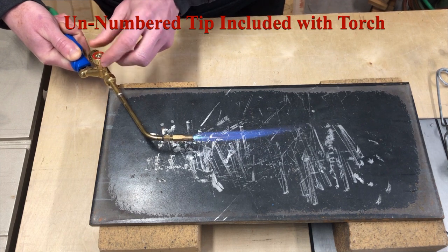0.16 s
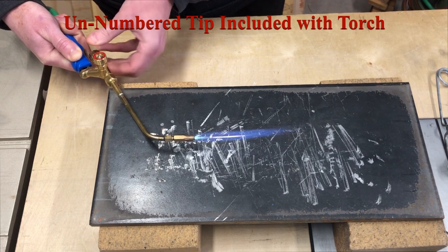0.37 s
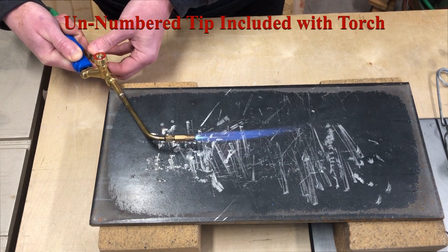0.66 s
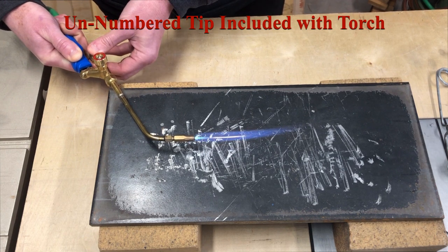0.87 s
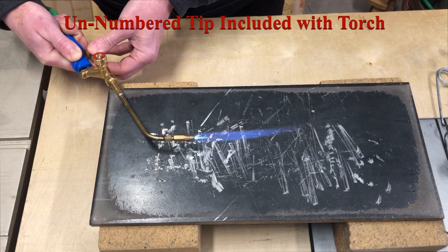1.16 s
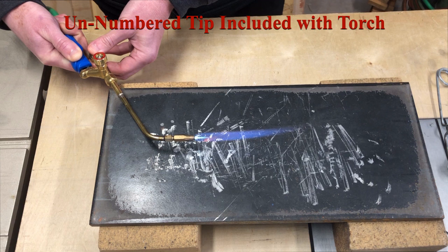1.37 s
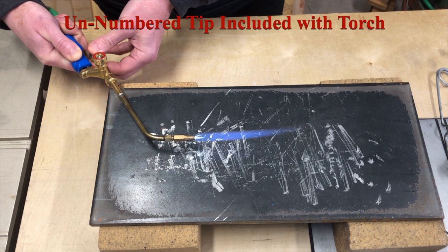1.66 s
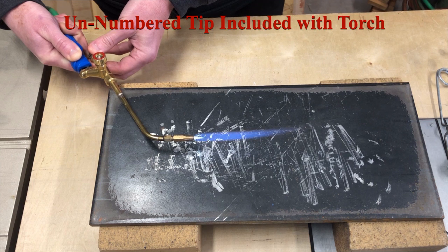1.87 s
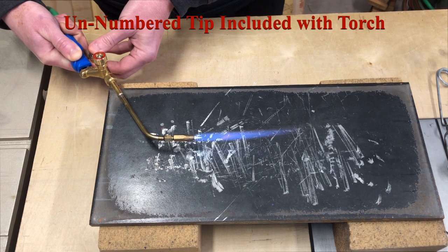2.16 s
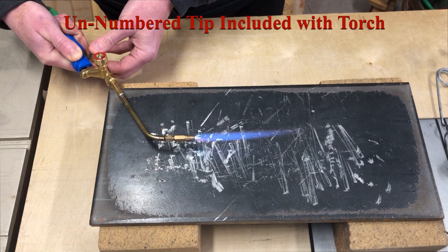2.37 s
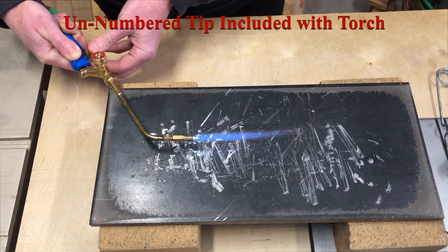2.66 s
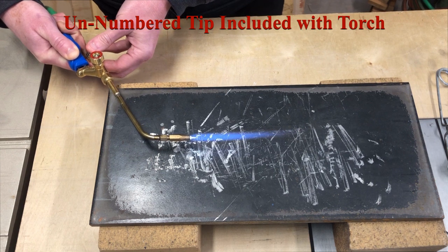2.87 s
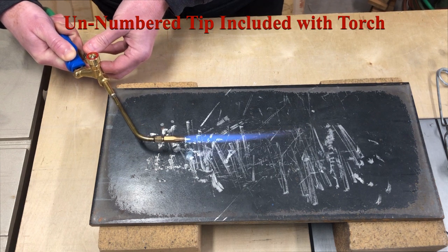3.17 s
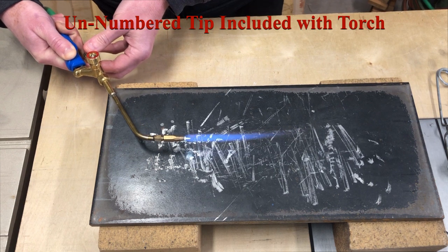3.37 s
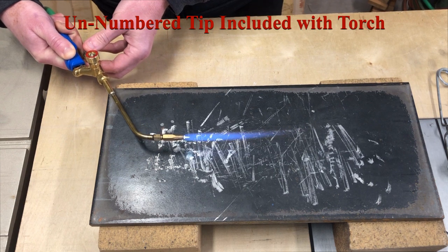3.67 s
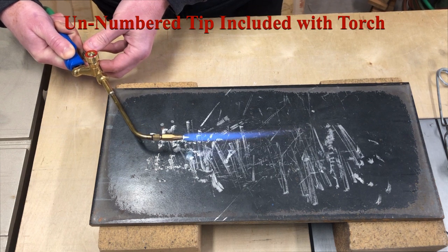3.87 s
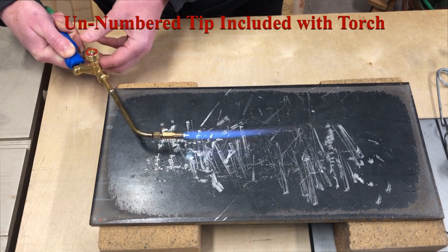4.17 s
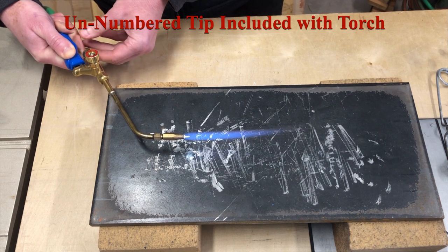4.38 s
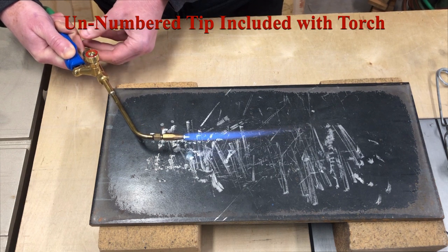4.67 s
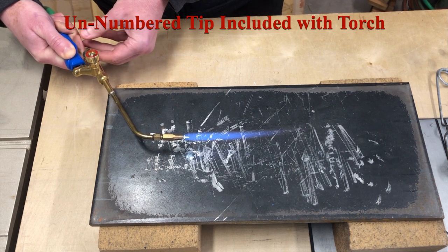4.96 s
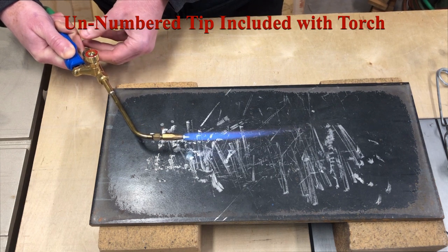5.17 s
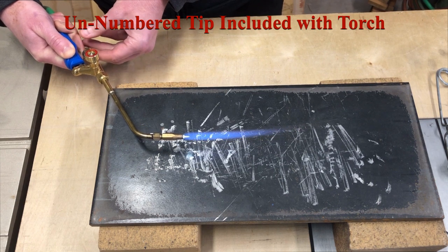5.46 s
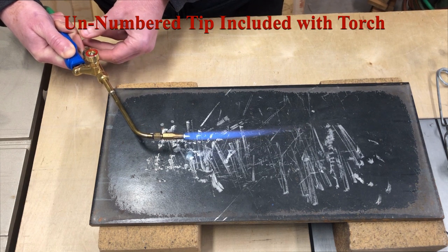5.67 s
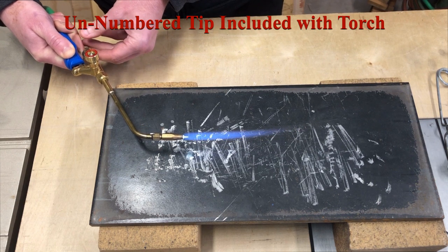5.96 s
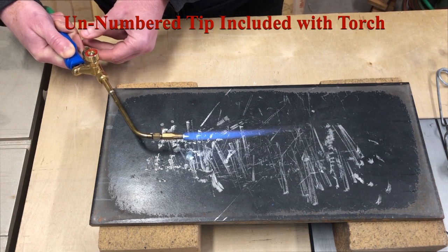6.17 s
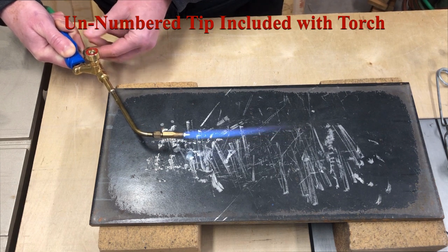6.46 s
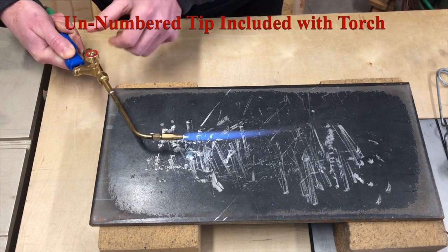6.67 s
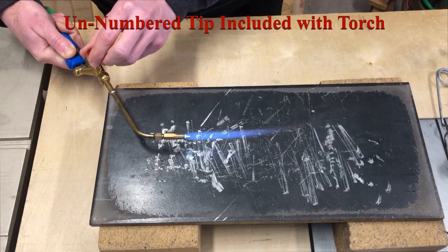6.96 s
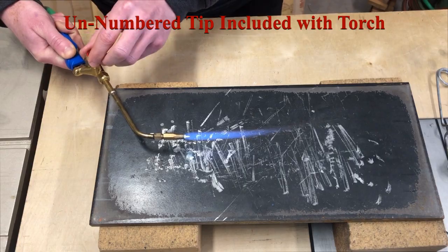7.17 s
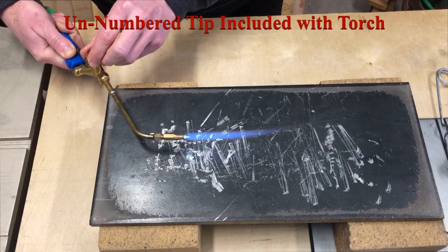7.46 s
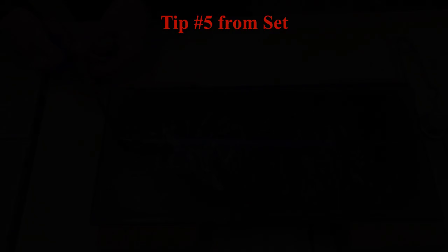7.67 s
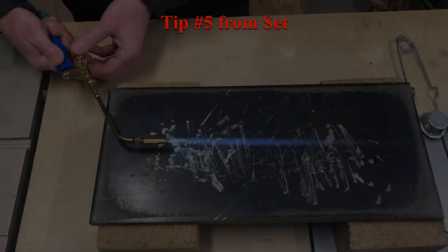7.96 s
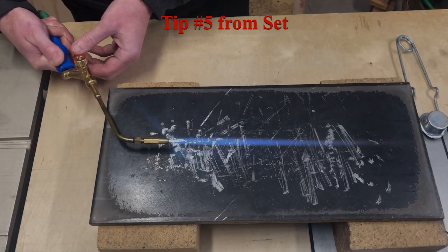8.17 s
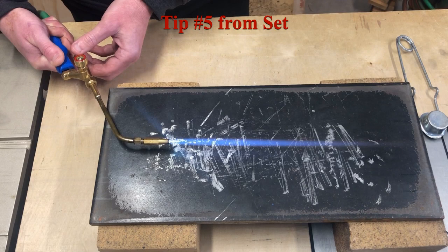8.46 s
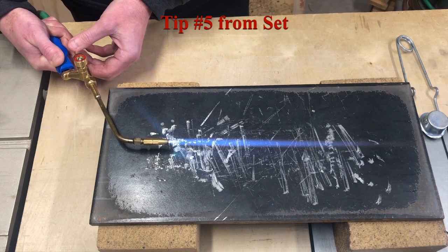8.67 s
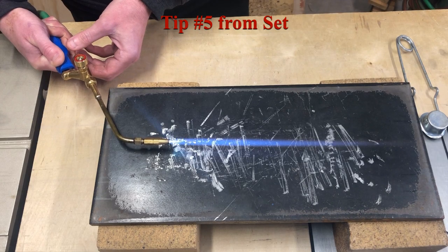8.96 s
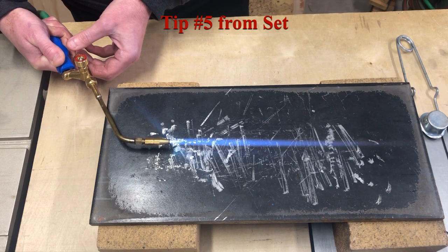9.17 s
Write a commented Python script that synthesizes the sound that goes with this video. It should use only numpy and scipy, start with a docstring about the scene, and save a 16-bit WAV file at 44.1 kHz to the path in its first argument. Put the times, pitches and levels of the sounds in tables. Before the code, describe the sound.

A hand-held gas torch burns over a stone slab on an indoor bench. Its small flame gives a soft, midrange roar and thin hiss, with faint spits and brief dropouts at first. The hiss grows and steadies as the valve opens. Abruptly a larger jet takes over, far louder and brighter, rushing with quick sags and flares to the end. The microphone is close, with short workshop reflections.

```python
"""A small gas flame roars softly and its jet hisses, spitting and faltering at first; the hiss grows as the
valve is opened. Then, at a stroke, a larger tip burns, far louder and brighter. The hand-held torch burns
over a stone slab on a bench indoors. Flames and jets are noise shaped by resonances, those of the brass
tube among them, and shaken by eddies. Echoes from bench and walls color both tips. Rumble, deep lumps
of air and a fuzzy hum lie behind the small tip, a louder rumble behind the large one."""
import sys
import numpy as np
from scipy import signal
from scipy.fft import rfft, irfft
from scipy.io import wavfile
from scipy.ndimage import map_coordinates

SR = 44100
rng = np.random.default_rng(int(sys.argv[2]) if len(sys.argv) > 2 else 0)


def ratio(d):
    """dB to gain"""
    e = np.asarray(d, float) / 20
    return 10 ** e


def generate_wav(signal):
    """Clip the signal to [-1, 1] and save it as 16-bit WAV at the path in sys.argv[1]."""
    frames = np.transpose(np.atleast_2d(signal))
    scaled = np.clip(frames, -1, 1) * 32767
    pcm = np.round(scaled).astype(np.int16)
    wavfile.write(sys.argv[1], SR, pcm)


N = 411012  # length in samples
FRAME, HOP = 2048, 256  # short-time spectra, in samples
HZ = np.fft.rfftfreq(FRAME, 1 / SR)  # frequency of each bin
T = np.arange(N // HOP + 9) * HOP / SR  # time of each frame in seconds


def evened(x):
    """Scales to rms 1."""
    return x / np.sqrt(np.mean(x ** 2))


def unit(power):
    """Makes the total power 1 in every frame."""
    return power / power.sum(-1, keepdims=True)


def columns(rows):
    """Turns the columns of a timed table into curves with one value a frame."""
    seconds, *values = np.transpose(rows)
    return [np.interp(T, seconds, v)[:, None] for v in values]


def bump(middle_s, half_length_s):
    """A smooth flat-topped hump in time."""
    return np.exp(-((T[:, None] - middle_s) / half_length_s) ** 4)


def spectrum(points):
    """Reads a spectrum table as power per bin, with total power 1."""
    hz, db = np.transpose(points)
    return unit(ratio(np.interp(np.log(HZ + 1), np.log(hz + 1), db)) ** 2)


def ringing(modes, state=np.zeros(1), from_hz=0, to_hz=SR):
    """Power per bin of steep resonances, whose levels glide from column to column with the state."""
    modes = np.array([m for m in modes if from_hz <= m[0] < to_hz])
    center_hz, width_hz = modes[:, :1], modes[:, 1:2]
    shape = 1 / (1 + ((HZ - center_hz) / width_hz) ** 2) ** 2
    db = np.array([np.interp(state, range(len(m) - 2), m[2:]) for m in modes])
    return unit(ratio(db.T) ** 2 @ shape)


def drift(seconds, hz=None):
    """Smooth chance of rms 1: one value a frame, or with hz, patches over frame and frequency."""
    x = rng.standard_normal((len(T), len(HZ) if hz else 1))
    x = signal.lfilter([1], [1, -np.exp(-HOP / SR / seconds)], x, axis=0)
    if hz:  # blur along frequency
        blur = np.exp(-(np.arange(len(HZ) // 2 + 1) * hz / SR * 2 * np.pi) ** 2)
        x = irfft(rfft(x, axis=1) * blur, len(HZ), axis=1)
    return evened(x)


def noise(power, size=1):
    """Random short-time spectra with the given power; shorter frames (FRAME / size) follow quick changes."""
    power = power[:, ::size] * size
    real, imaginary = rng.standard_normal((*power.shape, 2)).T
    spectra = (real + 1j * imaginary) * np.sqrt(power.T)
    x = signal.istft(spectra, nperseg=FRAME // size, noverlap=FRAME // size - HOP)[1]
    return np.sqrt(FRAME / size / HOP / 3) * x[:N]


def gusts(depth_db, seconds):
    """Fast eddies: a gain that shakes from moment to moment."""
    x = signal.lfilter([1], [1, -np.exp(-1 / SR / seconds)], rng.standard_normal(N))
    return evened(ratio(depth_db * evened(x)))


# The small tip as its valve opens. Each row: time in seconds, valve (0 starved, 1 half, 2 open),
# brightness in dB per octave, flame roar in dB, jet hiss in dB.
SMALL_TIP = [(0, 0, 0, -56.5, -66.5), (.6, 0, -2, -56, -67.5), (1.2, .1, -1, -55.5, -67.5),
             (1.5, .3, 2.2, -53, -64), (1.8, .3, 3.6, -51.5, -60), (2.1, 1.4, 0.3, -50, -57),
             (2.5, 1.05, -1, -50.5, -56.5), (2.8, 1, -1, -49.8, -56), (3.0, 1.1, -1, -52.5, -57),
             (3.3, 1.06, .5, -52.3, -56.1), (3.6, 2, -.5, -50.5, -54.5), (4.0, 1.95, -.6, -51.5, -54.6),
             (4.5, 2.2, -1, -50.5, -55), (5.2, 2.03, -1.3, -49.8, -53.5), (6.0, 2.1, -0.1, -50, -53),
             (6.5, 2.0, 0.5, -50.7, -53), (6.9, 1.98, .1, -49.8, -52.2), (7.35, 1.5, 1.0, -48.5, -51.4),
             (7.64, 1.92, 1.3, -50.5, -51.5)]


def small_tip():
    """Roar, flutter, hiss and spits; opening the valve shifts power among the modes and steadies the jet."""
    valve, tilt_db, roar_db, hiss_db = columns(SMALL_TIP)
    flame = small_roar(valve, roar_db) + flutter()
    flame *= ratio(0.56 * drift(0.11, 300)) ** 2
    jet = small_hiss(valve, tilt_db, hiss_db) + whistle()
    return noise(flame) * gusts(0.87, 0.0026) + noise(jet, size=2) * gusts(0.75, 0.0028) + spits()


# Brief dips of the small jet, mostly while starved. Each row: middle in seconds, depth in dB,
# half length in seconds.
FALTERS = [(.25, -8, 0.027), (0.49, -7, 0.028), (0.707, -9, 0.028), (0.894, -4.5, .035), (5.91, -4, .025)]


def falters():
    """The small jet falters: a dip in dB that lower hiss, roar and flutter share."""
    return sum(db * bump(s, half_length) for s, db, half_length in FALTERS)


# Modes of the small flame over the slab. Each row: frequency in Hz, width in Hz, relative level in dB
# when starved, relative level in dB from half open on.
SMALL_ROAR_MODES = [(870.0, 128.0, -12.0, -16.5), (990.0, 52.0, -7.5, -13.5), (1090.0, 105.0, -7.0, -10.0),
                    (1330.0, 91.0, 3.5, 0.0), (1470.0, 96.0, 1.0, -2.0), (1590.0, 68.0, -2.0, -5.0),
                    (1710.0, 119.0, 2.0, 1.0), (1820.0, 18.0, -3.5, -12.0), (1960.0, 101.0, 3.0, 2.0),
                    (2080.0, 53.0, -0.0, 0.5), (2180.0, 116.0, -1.5, -1.0), (2270.0, 75.0, 1.0, -0.5),
                    (2380.0, 95.0, 4.5, 5.0), (2560.0, 77.0, 2.0, 2.5), (2630.0, 75.0, 3.0, 5.0),
                    (2680.0, 55.0, -2.0, -19.5), (2770.0, 91.0, 2.0, 3.5), (2950.0, 83.0, -2.0, 0.5),
                    (3020.0, 53.0, -2.5, 1.0), (3170.0, 96.0, -7.5, -4.5), (3270.0, 61.0, -7.5, -2.0),
                    (3430.0, 208.0, -18.0, -8.5), (3680.0, 335.0, -9.0, -9.5)]


def small_roar(valve, roar_db):
    """The flame over the slab roars as noise in modes that follow the valve; it takes part of each falter."""
    roar_db = roar_db + 0.46 * falters() + 0.35 * drift(0.04)
    return ratio(roar_db) ** 2 * unit(ringing(SMALL_ROAR_MODES, valve[:, 0]) * (HZ <= 3720))


# Low flutter modes of the small flame. Each row: frequency in Hz, width in Hz, relative level in dB.
FLUTTER_MODES = [(290, 80, -9.5), (348, 45, -3), (453, 29, -2), (516, 56, -1.5), (692, 80, 0)]
# The low flutter swells and sinks. Each row: time in seconds, level in dB.
FLUTTER_LEVEL = [(0, -71), (.3, -69.5), (1.1, -67.5), (1.45, -75), (1.62, -66), (2.2, -67), (2.5, -71),
                 (2.8, -74), (3.0, -80), (3.4, -79), (3.6, -74.5), (4.6, -76), (5.1, -72.5), (6.5, -74.5),
                 (7.15, -74), (7.3, -68), (7.64, -71)]


def flutter():
    """Low flutter of the flame, wavering by chance; its highest mode follows the swells only in part."""
    low_db = columns(FLUTTER_LEVEL)[0] + 0.7 * falters() + 1.57 * drift(0.037)
    top_db = -73 + 0.6 * (low_db - low_db.mean())
    top = unit(ringing(FLUTTER_MODES, from_hz=600) / (1 + (HZ / 770) ** 40))
    return ratio(low_db) ** 2 * ringing(FLUTTER_MODES, to_hz=600) + ratio(top_db) ** 2 * top


# Modes of the small tip and tube. Each row: frequency in Hz, width in Hz, then relative levels in dB when
# starved, half open and open.
SMALL_TUBE_MODES = [(3690.0, 493.0, 7.0, 3.0, -2.0), (4210.0, 408.0, 5.0, -3.5, -3.5),
                    (4580.0, 228.0, 6.0, 8.0, 3.0), (5050.0, 245.0, -3.5, -0.0, -9.0),
                    (5340.0, 416.0, 1.5, -4.0, -6.0), (5810.0, 229.0, -2.5, -1.5, -10.0),
                    (6150.0, 135.0, -4.5, -0.5, -4.5), (6380.0, 114.0, 0.5, 3.5, -5.0),
                    (6720.0, 249.0, 0.5, 6.0, -1.5), (7150.0, 96.0, -11.0, -5.0, -35.5),
                    (7340.0, 422.0, -12.0, -5.0, -18.5), (8140.0, 441.0, -11.0, -16.5, -6.0),
                    (8460.0, 228.0, -2.5, -10.5, -5.5), (8740.0, 160.0, 2.5, -0.5, 2.5),
                    (8970.0, 208.0, -3.5, -0.5, 0.5), (9500.0, 399.0, -11.5, -29.5, -3.5),
                    (10030.0, 492.0, 1.5, -2.0, -1.5), (10570.0, 325.0, 1.0, -1.0, 2.0),
                    (11160.0, 340.0, -4.0, -2.5, 1.5), (11730.0, 422.0, -3.0, -3.5, -3.0),
                    (12040.0, 54.0, -9.5, -5.0, -12.5), (12440.0, 63.0, -11.5, -9.0, -7.0),
                    (12960.0, 486.0, -7.5, -29.0, 4.0), (13350.0, 334.0, -0.5, 1.0, 6.0),
                    (13750.0, 685.0, -13.5, 1.0, 1.0), (14390.0, 90.0, -13.5, -4.0, -5.0),
                    (14830.0, 986.0, -4.5, -4.5, -3.0), (15330.0, 251.0, -3.5, -2.5, -28.5),
                    (15640.0, 245.0, -32.0, 2.5, -2.0)]
# The highest hump of the small jet moves up, then down. Each row: time in seconds, shift in Hz.
HUMP_SHIFT = [(0, 0), (3.3, 0), (3.8, 250), (5, 150), (6.3, 50), (7, -120), (7.64, -200)]


def small_hiss(valve, tilt_db, hiss_db):
    """Jet noise rings the tube modes; a starved jet sputters in the upper middle."""
    tilt = ratio(tilt_db * np.log2((HZ + 1) / 8000)) ** 2
    hiss = unit(ringing(SMALL_TUBE_MODES, valve[:, 0]) * (HZ > 3720) * tilt)
    # only the region around 13300 Hz is shifted
    shift_hz = columns(HUMP_SHIFT)[0] / (1 + ((HZ - 13300) / 1500) ** 4)
    frame_index = np.arange(len(T))[:, None] + 0 * HZ
    hiss = map_coordinates(hiss, [frame_index, (HZ - shift_hz) * FRAME / SR], order=1)
    starved = np.clip(1.2 - valve, 0, 1) / (1 + ((HZ - 9500) / 4500) ** 8)
    sputter_db = (0.6 + 3.2 * starved) * drift(0.0098, 250)
    hiss *= ratio(hiss_db + sputter_db + 0.5 * drift(0.03)) ** 2
    # the falters reach the lower hiss, around 6300 Hz
    hiss *= ratio(falters() / (1 + ((HZ - 6300) / 1500) ** 8)) ** 2
    return hiss


# A narrow whistle of the small jet, from half open into open. Each row: time in seconds, level in dB.
WHISTLE_LEVEL = [(1.6, -100), (2.5, -82), (2.75, -71), (3.2, -66), (3.4, -73), (4.0, -71), (4.25, -68),
                 (4.65, -82), (5.2, -100)]


def whistle():
    """A narrow band of noise that wanders around 6690 Hz."""
    center_hz = 6690 + 40 * drift(0.05)
    shape = unit(1 / (1 + ((HZ - center_hz) / 60) ** 2) ** 2)
    return ratio(columns(WHISTLE_LEVEL)[0]) ** 2 * shape


# Faint spits of the starved jet. Each row: time in seconds, click peak in dB before the band filter.
SPITS = [(0.1421, -48), (0.2259, -48), (0.2573, -53), (0.2912, -49), (0.3905, -51), (0.4419, -51),
         (0.5556, -50), (0.7796, -53), (1.0944, -51)]


def spits():
    """Single clicks pass a band filter and turn into short spits."""
    clicks = np.zeros(N)
    seconds, db = np.transpose(SPITS)
    clicks[np.round(seconds * SR).astype(int)] = ratio(db)
    return signal.lfilter(*signal.butter(2, [2000, 9500], "band", fs=SR), clicks)


def large_tip():
    """A faster jet: the higher tube modes lead and throb together."""
    sag_db = sags()
    roar = noise(large_roar(sag_db), size=2) * gusts(0.66, 0.0042)
    jet = noise(large_jet(sag_db), size=2) * gusts(2.02, 0.0028)
    return roar + jet


# The large jet sags, then snaps back. Each row: time of the snap in seconds, depth in dB,
# time constant of the sag in seconds.
SAGS = [(7.905, -4.5, .04), (8.007, -5, .02), (8.115, -3.5, 0.022), (8.175, -3, .015), (8.39, -3, .03),
        (8.67, -3.5, .03), (8.952, -2.5, .03)]


def sags():
    """Each sag deepens faster and faster, then ends at once: a curve in dB."""
    t = T[:, None]
    return sum(db * np.exp(np.minimum(t - s, 0) / length) * (t < s) for s, db, length in SAGS)


# Brief flares of the large flame. Each row: middle in seconds, level in dB, half length in seconds,
# dip of the top fizz in dB.
FLARES = [(7.952, -54, .015, -4), (8.056, -50, .02, -5), (8.224, -47, .02, -8), (8.98, -50, .016, -1)]
# Fizz of the large jet. Each row: time in seconds, jet fizz in dB, top fizz in dB.
LARGE_FIZZ = [(7.66, -35.5, -44), (7.73, -33.3, -42), (7.85, -35, -42), (8.2, -34.5, -44),
              (8.27, -32.8, -42), (8.55, -34.5, -42.5), (8.75, -33.5, -41), (8.9, -35, -41),
              (9.05, -33.4, -40), (9.32, -34, -37.5)]
# Modes of the large tip and tube. Each row: frequency in Hz, width in Hz, relative level in dB.
LARGE_TUBE_MODES = [(4940.0, 126.0, -19.5), (5540.0, 152.0, 5.5), (5820.0, 138.0, -5.0),
                    (6220.0, 123.0, -11.0), (6590.0, 131.0, 0.5), (6840.0, 257.0, -1.0),
                    (7210.0, 312.0, -2.0), (7510.0, 156.0, 1.5), (7990.0, 397.0, -1.5),
                    (8230.0, 137.0, -1.5), (8500.0, 218.0, -4.5), (8980.0, 193.0, 2.0),
                    (9130.0, 670.0, -1.5), (10020.0, 296.0, 3.5), (10380.0, 78.0, -5.5),
                    (10720.0, 173.0, -3.5), (11010.0, 209.0, 4.5), (11310.0, 307.0, 1.5),
                    (11690.0, 144.0, -0.5), (12080.0, 434.0, 4.0), (12690.0, 443.0, -5.5),
                    (12900.0, 184.0, -3.0), (13460.0, 131.0, -6.5), (13710.0, 188.0, -3.5),
                    (14120.0, 153.0, 0.5), (14370.0, 143.0, -1.5), (14690.0, 556.0, -0.5),
                    (15430.0, 122.0, -4.5), (15560.0, 329.0, -2.5)]


def large_jet(sag_db):
    """Turbulence rings the tube modes in two parts; both dip during flares and sags, by different shares."""
    fizz_db, top_db = columns(LARGE_FIZZ)
    dip_db = sum(db * bump(s, half_length) for s, _, half_length, db in FLARES)
    fizz = unit(ringing(LARGE_TUBE_MODES, to_hz=13200) * (HZ > 4960))
    jet = ratio(fizz_db + sag_db + 0.4 * dip_db) ** 2 * fizz
    jet += ratio(top_db + 0.4 * sag_db + dip_db) ** 2 * ringing(LARGE_TUBE_MODES, from_hz=13200)
    return jet * ratio(0.66 * drift(0.032, 400) + 0.55 * drift(0.013)) ** 2


# Low and middle modes of the large roar, flame and tube together. Each row: frequency in Hz, width in Hz,
# relative level in dB.
LARGE_ROAR_MODES = [(540.0, 44.0, -14.5), (670.0, 54.0, -4.0), (750.0, 71.0, -7.0), (860.0, 70.0, -0.0),
                    (980.0, 51.0, 3.0), (1050.0, 72.0, 2.0), (1160.0, 69.0, 6.0), (1310.0, 123.0, 3.5),
                    (1490.0, 58.0, -0.0), (1630.0, 106.0, -0.5), (1800.0, 117.0, -4.5),
                    (2030.0, 143.0, -6.5), (2210.0, 143.0, -2.5), (2340.0, 75.0, -3.5),
                    (2620.0, 273.0, -1.0), (2890.0, 252.0, -2.5), (3060.0, 66.0, -5.0),
                    (3210.0, 47.0, -2.0), (3450.0, 144.0, 5.0), (3670.0, 69.0, -4.5), (3810.0, 221.0, -2.5),
                    (4050.0, 82.0, -6.0), (4470.0, 161.0, 5.5), (4960.0, 196.0, -6.0)]
# Workshop rumble near the large flame. Each row: frequency in Hz, relative level in dB per Hz.
LARGE_RUMBLE = [(12, -42), (20, -12), (38, -16), (147, -5.5), (228, -8), (290, -13.5), (349, -9),
                (458, -18), (600, -19.5), (780, -31), (1320, -120)]


def large_roar(sag_db):
    """Flame and tube roar in low and middle modes, with rumble below and brief flares around 3400 Hz."""
    low = ratio(-51.5 + 0.8 * drift(0.018)) ** 2 * ringing(LARGE_ROAR_MODES, to_hz=2100)
    middle_shape = unit(ringing(LARGE_ROAR_MODES, from_hz=2100) * (HZ <= 4960))
    middle = ratio(-50 + 0.97 * sag_db + drift(0.02)) ** 2 * middle_shape
    roar = (low + middle) * ratio(0.48 * drift(0.083, 500)) ** 2
    rumble = ratio(-68) ** 2 * spectrum(LARGE_RUMBLE)
    flare_power = sum(ratio(db) ** 2 * bump(s, half_length) for s, db, half_length, _ in FLARES)
    return roar + rumble + flare_power * ringing([(3400, 550, 0)])


def room(x, echo_db=-10.0, t60=0.33):
    """Dense echoes from bench and walls leave a fine, fixed ripple on the hiss."""
    t = np.arange(SR // 4) / SR
    tail = rng.standard_normal(len(t)) * ratio(-60 * t / t60) * (t > 0.004)
    tail *= ratio(echo_db) / np.linalg.norm(tail)
    tail[0] = 1  # the direct sound
    return signal.oaconvolve(x, tail / np.linalg.norm(tail))[:N]


# Workshop rumble near the small flame. Each row: frequency in Hz, relative level in dB per Hz.
RUMBLE = [(12, -51), (20, -26), (50, -19), (85, -3), (100, -4), (129, -19), (161, -2), (248, -4.5),
          (507, -11), (595, -10.5), (676, 7), (900, -21), (1170, -38), (1980, -120)]
# The strongest deep lumps of air. Each row: middle in seconds, rise in dB, half length in seconds.
LUMPS = [(.4, 6, .03), (1.42, 7, .05), (1.9, 10, .07), (2.16, 10, .06), (2.82, 5, .05), (3.33, 4, .06),
         (4.02, 6, .05), (4.68, 6, .04), (6.25, 6, .06), (7.0, 6, .07), (7.33, 6, .04)]
# A fuzzy hum that comes and goes. Each row: time in seconds, level in dB.
HUM_LEVEL = [(0, -86), (.74, -79), (1.05, -85), (2.0, -84), (2.8, -83), (3.3, -90), (4.6, -88), (4.9, -82),
             (5.6, -87), (6.0, -83), (6.6, -81), (7.0, -85), (7.64, -85)]


def workshop():
    """Low rumble, deep lumps of moving air and a fuzzy hum, all as shaped noise."""
    rumble = ratio(-75.5) ** 2 * spectrum(RUMBLE)
    lumps_db = -95 + 3 * drift(0.03) + sum(db * bump(s, half_length) for s, db, half_length in LUMPS)
    lumps = ratio(lumps_db) ** 2 * ringing([(25, 25, -6), (88, 25, -2)])
    hum = ratio(columns(HUM_LEVEL)[0] + 1.5 * drift(0.08)) ** 2 * ringing([(165, 10, 0)])
    return noise(rumble + lumps + hum)


def scene():
    """The small tip, then at once the large one."""
    large = np.clip((np.arange(N) / SR - 7.651) / 0.0015, 0, 1)  # swap at 7.651 s, within 1.5 ms
    before = room(small_tip()) + workshop()
    after = room(large_tip())
    return ((1 - large) * before + large * after)[None]


def low_pass(x):
    """Removes everything above the highest recorded frequency."""
    return signal.sosfilt(signal.butter(12, 16860, fs=SR, output="sos"), x)


def record(dry):
    """A steep low-pass filter limits the band to 15740 Hz."""
    edge = signal.firwin(1023, 15740, window=("kaiser", 10), fs=SR)
    mix = signal.oaconvolve(dry, edge[None], "same")
    return low_pass(mix)


dry = scene()
out = record(dry)
generate_wav(out)
```